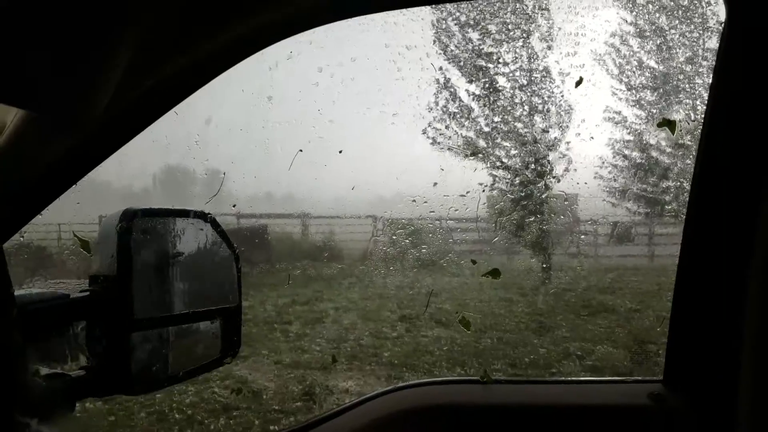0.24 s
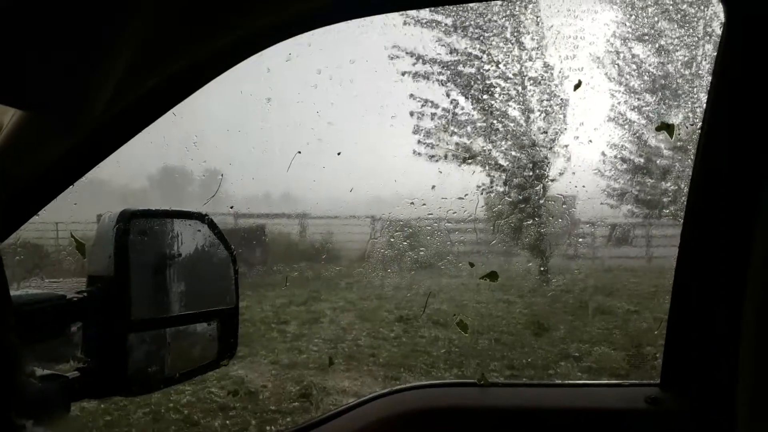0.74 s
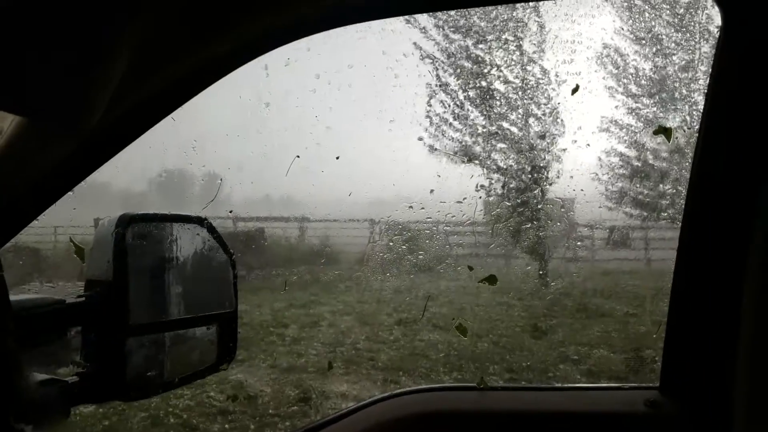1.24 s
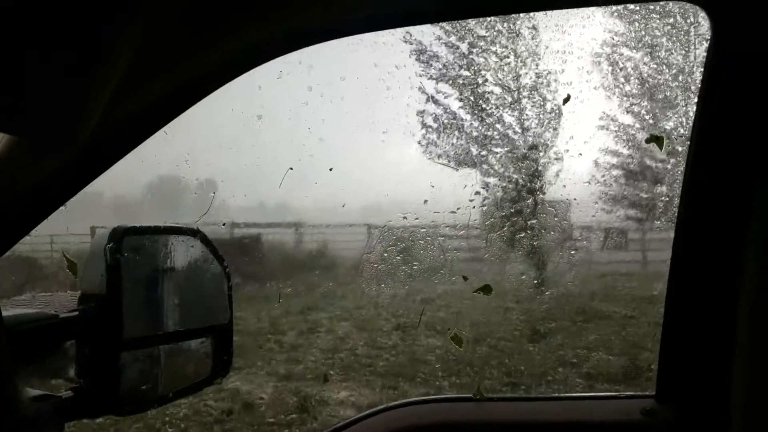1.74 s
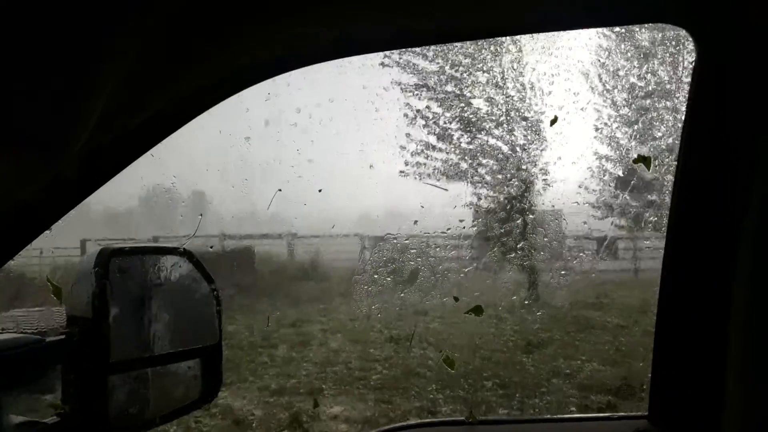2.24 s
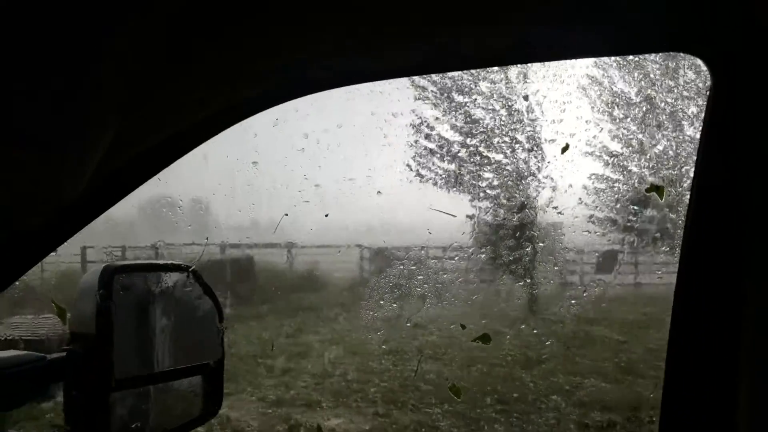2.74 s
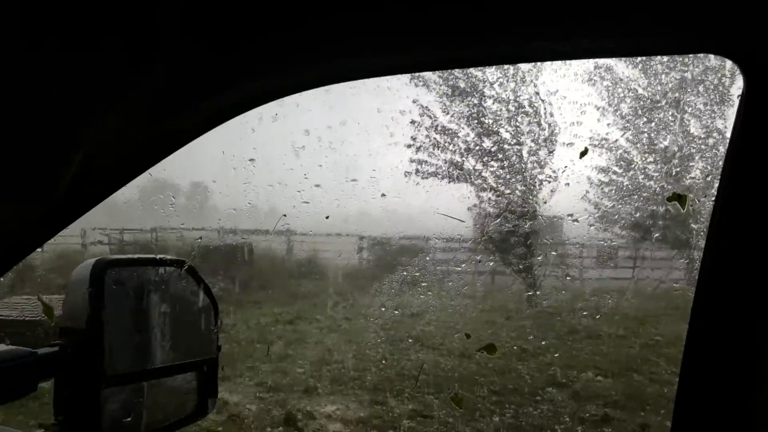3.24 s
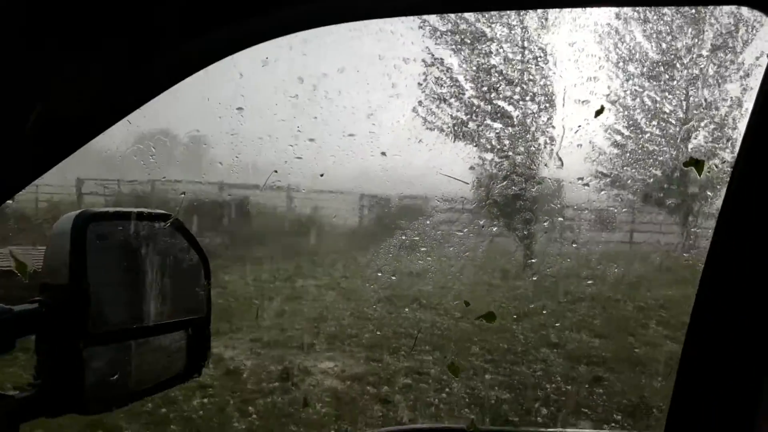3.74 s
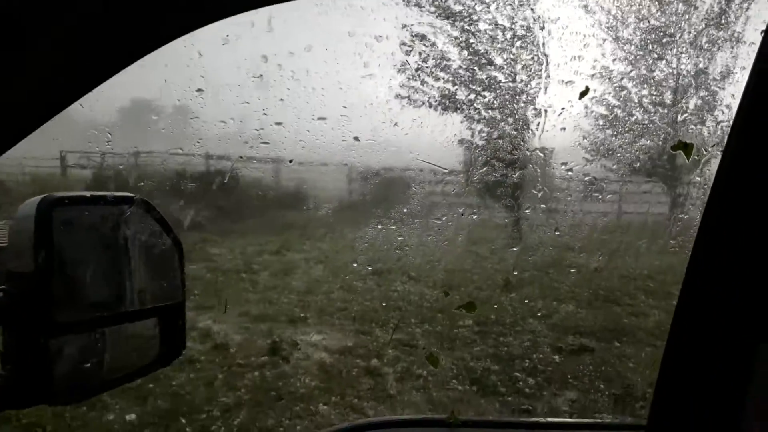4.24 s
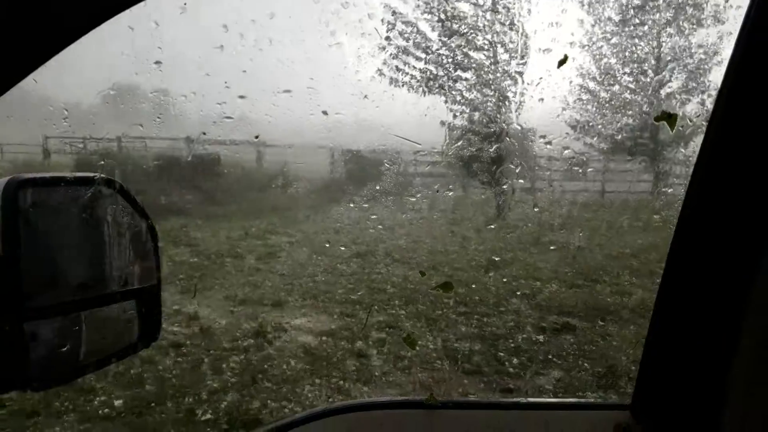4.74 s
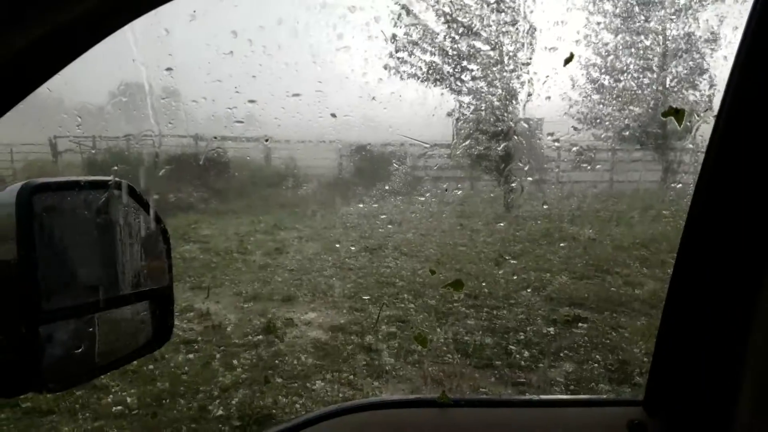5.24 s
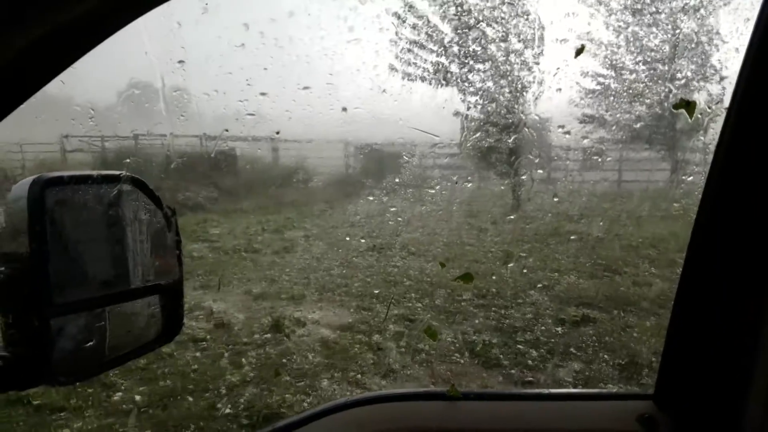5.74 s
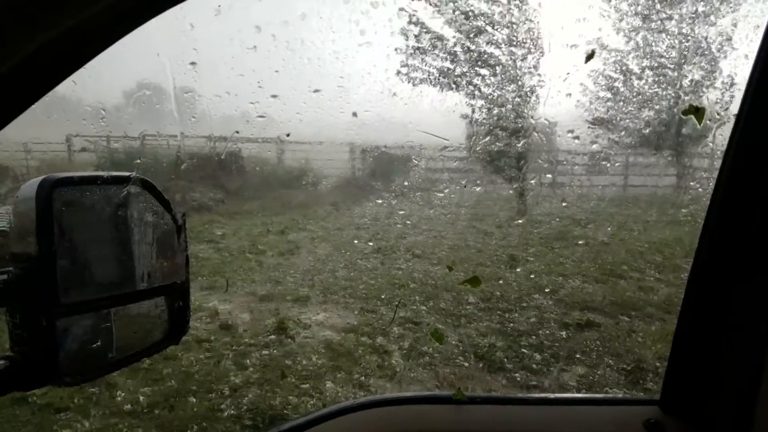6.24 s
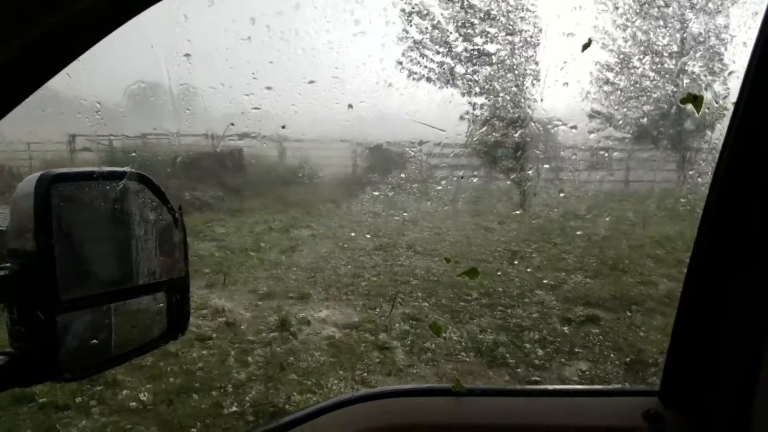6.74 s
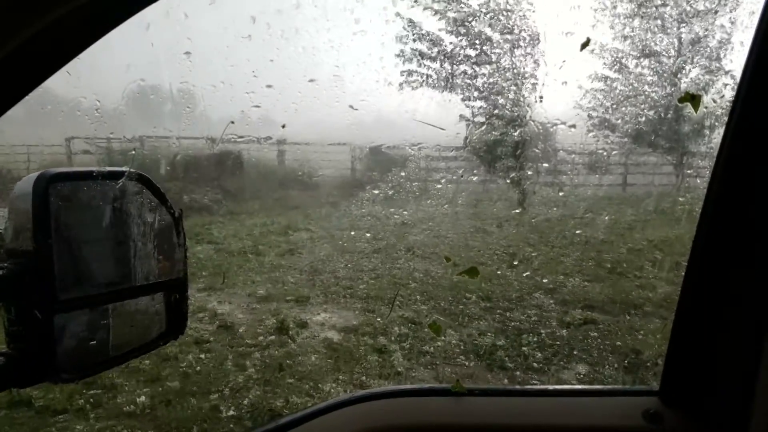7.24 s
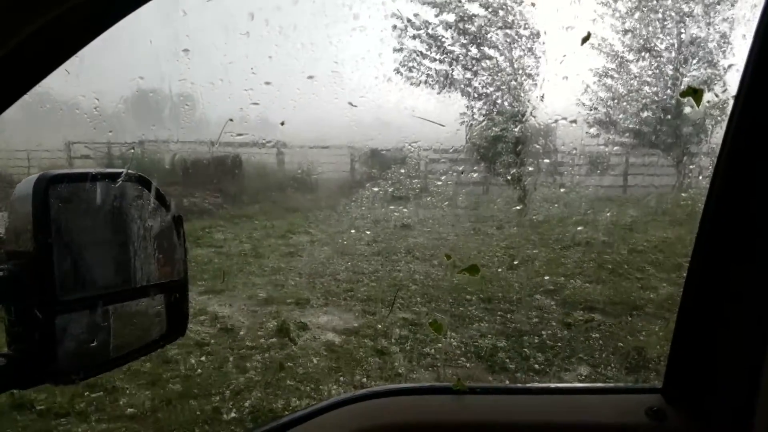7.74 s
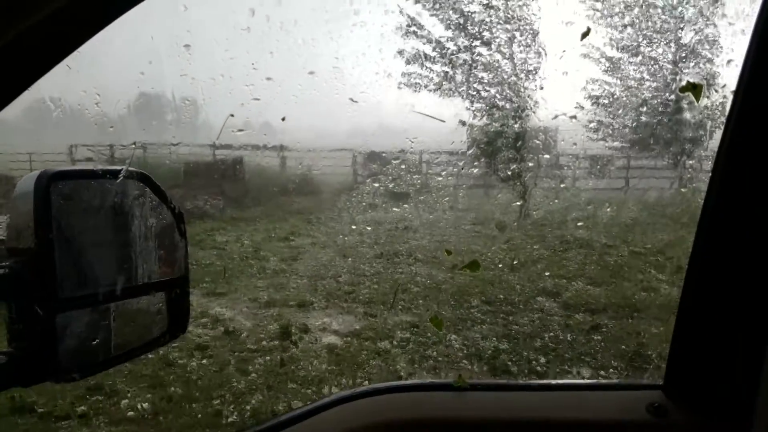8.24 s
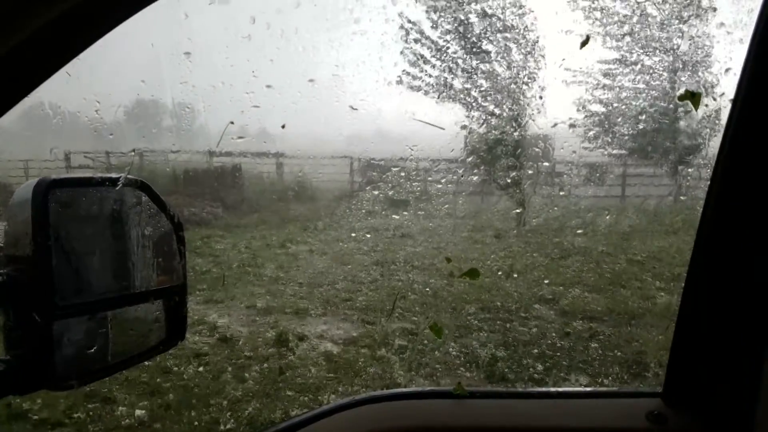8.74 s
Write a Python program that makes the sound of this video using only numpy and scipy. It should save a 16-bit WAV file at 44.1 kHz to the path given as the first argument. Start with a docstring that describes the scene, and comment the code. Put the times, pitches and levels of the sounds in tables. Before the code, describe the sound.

Hailstones hit the metal roof and windows around the listener in a dry, small cab. Dense rattling knocks and two heavy drum-like thuds come first, then irregular snapping cracks, a busy cluster of dull taps midway, and a few hard bright ticks on the near glass. The last seconds are mostly quiet, with weak isolated knocks over soft rain patter, a low rumble and faint microphone hiss.

```python
"""Hail on a parked vehicle

Heard from inside the closed cab: ice cracks and shatters on roof and glass (band-filtered noise bursts),
heavy stones set the body panels drumming (decaying sine modes), and a few hard ticks strike the near window.
Rain and small pellets patter underneath (shaped noise). A small microphone port rings near 8 kHz."""
import sys
import numpy as np
from scipy import signal
from scipy.fft import rfft, irfft
from scipy.io import wavfile
from scipy.ndimage import uniform_filter1d

SR = 44100
rng = np.random.default_rng(int(sys.argv[2]) if len(sys.argv) > 2 else 0)


def persist_wave(psi):
    """Save psi, clipped to +-1, as 16-bit WAV."""
    counts = np.round(np.clip(psi, -1, 1) * 32767).astype(np.int16)
    wavfile.write(sys.argv[1], SR, np.atleast_2d(counts).T)


def boost_factor(decibels):
    """Convert a level in decibels to a linear amplitude factor."""
    exponent = np.asarray(decibels, float) / 20
    return 10 ** exponent


N = 396459  # length in samples

# modes of the body panels and cabin air: pitch_hz, level_db (relative), t60_ratio (to the blow's own t60)
PANEL_MODES = [(62.2, -1.5, 1.7), (84, -1, 1.6), (120, 2.5, 1.2), (135, -2, 0.78), (166, -1, 0.57),
               (193, -3, 1.1), (229, -2, 0.75), (258, 0, 0.74), (302, 0.5, 0.91), (332.1, 0, 0.74),
               (353, -6.5, 1.3), (396.9, -2.5, 0.62), (449, -1, 0.48), (517.5, 2.5, 0.37), (572, 0, 0.63),
               (661, -3.5, 0.63), (751, 0, 0.35), (837, -7, 0.5), (930, -6.5, 0.43), (1040, -15, .35)]


def evened(x):
    """Normalization: scales a signal to unit rms."""
    return x / np.sqrt(np.mean(x ** 2) + 1e-20)


def add(mix, start_s, sound):
    """Superposition: sums a sound into the mix from its start time."""
    part = mix[max(round(start_s * SR), 0):][:len(sound)]
    part += sound[:len(part)]


def coloured(x, points):
    """Linear filtering: multiplies the spectrum by a gain curve given as (Hz, dB) points."""
    point_hz, gain_db = np.transpose(points)
    hz = np.fft.rfftfreq(len(x), 1 / SR)
    gain = boost_factor(np.interp(np.log(hz + 1), np.log(point_hz + 1), gain_db))
    return irfft(rfft(x) * gain, len(x))


def swell(t, rise_s, t60_s, curve):
    """Build-up and decay of reflections: peak 1, falling ever faster in dB if curve is over 1."""
    fall = (t / np.clip(t60_s, .002, .5)) ** curve
    shape = (1 - np.exp(-t / rise_s)) ** 2 * boost_factor(-60 * fall)
    return shape / shape.max(axis=0)


def electronics():
    """Circuit noise: a steady coloured fizz on a small constant offset."""
    # fizz spectrum: pitch_hz, level_db (relative, per Hz)
    fizz_spectrum = [(300, -1), (1000, -2.5), (2500, -2), (5500, -10.5), (8300, -6.5), (11000, -8),
                     (15500, -9.5), (20000, 0)]
    fizz = boost_factor(-72.5) * evened(coloured(rng.standard_normal(N), fizz_spectrum))
    offset = -.0004
    return fizz + offset


def rumble():
    """Transmission through panels: rain and far hail reach the cabin as a lumpy low wash of noise."""
    # course of the wash: time_s, level_db (before the lumps)
    wash_course = [(0, -60.5), (1.3, -60.5), (1.6, -68.5), (4.4, -67.5), (4.7, -71), (8.99, -72.5)]
    # wash spectrum: pitch_hz, level_db (relative, per Hz)
    wash_spectrum = [(20, -24), (45, -16.5), (75, -1.5), (118, -4), (165, -5), (240, -5), (630, -15.5),
                     (1500, -26.5), (3000, -55)]
    low, lump = rng.standard_normal((2, N))
    lumps_db = 3 * evened(uniform_filter1d(uniform_filter1d(lump, size=1500), size=1500))
    level_db = np.interp(np.arange(N) / SR, *np.transpose(wash_course))
    return evened(coloured(low, wash_spectrum)) * boost_factor(level_db + lumps_db)


def rain_hiss():
    """Incoherent addition: powers of the gusty rain, random drops and pellets sum under one treble noise."""
    # rain driven on the glass by gusts: time_s, level_db
    gust_course = [(0, -79.5), (0.95, -78), (1.9, -86), (2.2, -76), (2.55, -83.5), (3.05, -74.5),
                   (3.7, -85), (4.4, -77.5), (4.7, -85.5), (5.15, -89), (5.7, -83), (6.2, -89.5),
                   (7, -91.5), (7.4, -87.5), (8.1, -85.5), (8.4, -80), (8.99, -88.5)]
    # light pellets that only reach the treble: start_s, level_db (rms at the peak)
    pellet_hits = [(0.064, -68), (1.83, -70), (2.2826, -68.5), (2.365, -65.5), (2.439, -69.5), (2.612, -69),
                   (2.7503, -68.5), (3.375, -63), (3.485, -65.5), (3.5237, -69), (3.5922, -68),
                   (5.314, -65.5), (5.5858, -66), (5.603, -65.5), (6.1233, -73), (7.369, -67.5),
                   (7.386, -70), (7.4885, -70), (7.8502, -68.5), (8.244, -68.5), (8.4347, -71),
                   (8.5067, -68.5), (8.5576, -69.5), (8.592, -70)]
    # hiss spectrum: pitch_hz, level_db (relative, per Hz)
    hiss_spectrum = [(2000, -27.5), (5500, -10), (8000, -0.5), (11000, -5), (16000, -8.5)]
    t = np.arange(N) / SR
    high, draw, size = rng.standard_normal((3, N))
    level = boost_factor(np.interp(t, *np.transpose(gust_course)))
    is_drop = draw > 3.1  # rare random samples
    blow_power = (is_drop * level * boost_factor(-1 + 4 * abs(size))) ** 2
    for start_s, level_db in pellet_hits:
        blow_power[round(start_s * SR)] += boost_factor(level_db) ** 2
    splash_shape = swell(t[:4000], .001, 0.089, 0.88) ** 2
    splash_power = signal.oaconvolve(blow_power, splash_shape)[:N].clip(0)
    return evened(coloured(high, hiss_spectrum)) * np.sqrt(level ** 2 + splash_power)


def window_ticks():
    """Impact excitation: a bare click of ice on the near window, sharp enough to ring the microphone port."""
    # hard ticks: start_s, level_db (peak, before the port)
    tick_hits = [(4.8149, -27), (5.7699, -19), (5.7736, -21.5)]
    out, t = np.zeros(N), np.arange(300) / SR
    click = np.sin(2 * np.pi * 7900 * t) * swell(t, .0004, .0028, 1)
    for start_s, level_db in tick_hits:
        add(out, start_s, boost_factor(level_db) * click)
    return out


def drum(chance, low_db, struck_hz, upper_db):
    """Modal synthesis: a blow rings damped panel modes; each lands elsewhere, so sizes and phases vary."""
    # how long a middling blow rings, and how much shorter for each dB of extra force
    middling_db, middling_t60_s, t60_s_per_db = -45.5, .175, .0002
    # low modes fade away from the struck pitch, faster for heavy blows
    focus_db_per_oct, heavy_focus_per_db = 15.5, 0.27
    # bass takes longer to fill the cabin
    rise_s, rise_cycles = .0028, .65
    t = np.arange(14000)[:, None] / SR
    mode_hz, mode_db, t60_ratio = np.transpose(PANEL_MODES)
    low = mode_hz < 385
    force_db = low_db - middling_db
    t60_s = (middling_t60_s - t60_s_per_db * force_db) * t60_ratio
    focus = focus_db_per_oct + heavy_focus_per_db * force_db
    fade_db = focus * low * abs(np.log2(mode_hz / struck_hz))
    size = boost_factor(mode_db - fade_db + 8 * (chance[2] - .5))
    low_gain = boost_factor(low_db) / np.linalg.norm(size[low])
    upper_gain = boost_factor(upper_db) / np.linalg.norm(size[~low])
    size *= np.where(low, low_gain, upper_gain)
    shape = swell(t, rise_s + rise_cycles / mode_hz, t60_s, 1.5)
    # each mode has a detuned twin on the neighbouring panel, so the ring beats unevenly
    main_hz = mode_hz * (1 + 0.05 * (chance[1] - .5))
    twin_hz = mode_hz * (1 + .16 * (chance[3] - .5))
    rings = np.sin(2 * np.pi * (main_hz * t + chance[0]))
    rings += .7 * np.sin(2 * np.pi * (twin_hz * t + chance[4]))
    return 1.15 * (shape * rings) @ size


def shatter(noise, knock_db, knock_hz, splinter_db, t60_s):
    """Band-wise decay: splintering ice and reflections as grainy noise in bands, the treble dying first."""
    # band centres in Hz; the outer two are silent edges
    centres_hz = [450, 1150, 2400, 4600, 8000, 13500, 19000]
    # roof and glass as a filter: pitch_hz, gain_db
    shell_filter = [(3300, -2), (4300, 2), (6100, -2.5), (7200, -1.5)]
    # the knock fades below and above its pitch
    knock_rise_db_per_oct, knock_fall_db_per_oct = 10.5, 11.3
    # splinters spill into the bands below and above their own
    splinter_spill_db = np.array([-11, 0, -6.5])
    # rise time as a share of the t60: far, long cracks also start softly
    rise_s = .03 * t60_s
    t, hz = np.arange(len(noise)) / SR, np.fft.rfftfreq(len(noise), 1 / SR)
    grainy = noise[:, 0] * boost_factor(2.5 * evened(uniform_filter1d(noise[:, 1], size=40)))
    # every spot of the shell has its own crowd of short resonances
    spots_db = 3.2 * evened(uniform_filter1d(noise[:len(hz), 2], size=50))
    spectrum = rfft(grainy) * boost_factor(spots_db)
    octaves = np.log2(np.array(centres_hz[1:4]) / knock_hz)
    knock_fade_db = np.maximum(knock_fall_db_per_oct * octaves, -knock_rise_db_per_oct * octaves)
    knock = boost_factor(knock_db - knock_fade_db)
    splinter = boost_factor(splinter_db + splinter_spill_db)
    # knock and splinters share the middle band
    sizes = [knock[0], knock[1], np.hypot(knock[2], splinter[0]), splinter[1], splinter[2]]
    t60_ratios = [1.2, 1.05, 1., .95, .95]
    out = np.zeros(len(t))
    for k, (size, t60_ratio) in enumerate(zip(sizes, t60_ratios)):
        share = np.interp(np.log(hz + 1), np.log(centres_hz[k:k + 3]), [0, 1, 0]) ** 1.6
        # the time lead lets the direct crack arrive at once
        ring = swell(t + .0008, rise_s, t60_s * t60_ratio, 1.35)
        ring += boost_factor(-33.0) * swell(t, .01, 0.25, 1)  # the cabin's faint tail
        out += size * evened(irfft(spectrum * share, len(t))) * ring
    return coloured(out, shell_filter)


def scene():
    """Superposition of sources: thuds and cracks over rumble, rain hiss and ticks."""
    # blows that drum the panels: start_s, low_db (low modes together), struck_hz (best-driven pitch),
    # upper_db (upper modes together); levels before the twin modes and a common gain
    blows = [(0.115, -70, 200, -60), (.145, -51, 133, -52), (.175, -48.5, 200, -46.5), (.24, -45, 142, -42),
             (.279, -53, 222, -45), (.324, -46.5, 282, -42), (.429, -37, 324, -42.5),
             (0.484, -40, 270, -51.5), (0.52, -45, 147, -57), (.601, -18, 245, -31), (.625, -23, 200, -33),
             (0.655, -28, 207, -32.5), (.692, -32.5, 218, -43), (.746, -47.5, 248, -44),
             (.842, -56, 237, -40), (.88, -45, 260, -55), (.9, -16.5, 262, -21), (.918, -19, 180, -30),
             (.95, -26, 175, -42), (1.003, -49, 204, -59), (1.038, -43.5, 196, -47), (1.118, -43, 310, -38),
             (1.193, -56, 255, -43), (1.236, -50.5, 120, -44), (1.342, -49, 255, -43),
             (1.632, -50.5, 244, -44), (1.653, -67, 238, -42.5), (1.698, -49, 192.5, -69),
             (1.898, -57, 125, -73.5), (2.023, -43, 245, -48.5), (2.115, -50, 278, -48),
             (2.171, -40.5, 312, -40), (2.204, -46.5, 249, -61), (2.516, -52, 220, -48),
             (2.566, -50, 120, -72), (2.595, -54.5, 119, -71), (2.866, -60, 200, -56),
             (2.89, -49, 155, -55), (2.931, -49, 258, -49), (2.958, -56, 216, -40),
             (2.975, -35.5, 223, -50), (3.021, -45.5, 198, -61), (3.084, -53, 192, -68),
             (3.139, -48.5, 206, -50), (3.171, -52, 128, -64), (3.321, -44.5, 265, -45),
             (3.4, -48, 147, -53.5), (3.731, -52, 164, -52), (3.787, -45, 193, -46),
             (3.82, -51.5, 219, -57), (3.93, -55, 179, -59.5), (4.112, -49, 207, -42),
             (4.161, -50, 168, -58), (4.217, -44.5, 165, -50.5), (4.269, -42.5, 229, -41),
             (4.302, -38.5, 240, -40.5), (4.347, -40.5, 203, -41.5), (4.394, -45, 177, -67),
             (4.442, -40.5, 226, -44.5), (4.49, -56, 200, -57), (4.531, -50, 152, -56),
             (4.811, -65.5, 299, -56), (5.004, -51.5, 278, -43.5), (5.32, -65, 200, -63),
             (5.359, -61, 142, -56), (5.39, -60, 200, -63), (5.67, -53, 224, -55), (5.7, -53, 200, -62),
             (5.816, -56, 193, -64), (5.895, -58, 185, -57), (5.925, -52, 200, -50),
             (5.974, -47.5, 216, -56), (6.156, -48, 202, -64.5), (6.217, -44, 226, -51.5),
             (6.373, -53.5, 242, -48.5), (6.433, -39, 173, -44.5), (6.489, -51, 180, -63),
             (6.958, -66.5, 140.4, -64.5), (7.1, -58, 141, -70), (7.179, -53, 252, -57.5),
             (7.221, -49.5, 268, -52.5), (7.491, -62, 250, -65), (7.522, -45, 191, -52.5),
             (7.673, -53.5, 180, -57), (7.694, -49.5, 167.4, -56), (8.291, -57, 208, -59.5),
             (8.33, -58, 200, -62), (8.376, -59, 133, -56)]
    # ice cracking on the shell: start_s, knock_db, knock_hz, splinter_db, t60_s (scaled band by band);
    # levels are rms before the decay and the shell filter
    ice_cracks = [(0.1164, -62, 1700, -80, 0.14), (0.1429, -40.5, 1550.0, -53.5, 0.098),
                  (0.1783, -32, 3140.0, -42.5, 0.049), (0.2185, -51.0, 1400.0, -65, 0.2),
                  (0.2464, -41.5, 3220.0, -52, 0.14), (0.2794, -37, 3290.0, -60.5, 0.043),
                  (0.3226, -41.5, 2120.0, -53.5, 0.073), (0.429, -39.5, 2280.0, -70, 0.063),
                  (0.441, -53, 1240.0, -61, 0.056), (0.4852, -55, 1790.0, -66.5, 0.11),
                  (0.5098, -56.5, 4420.0, -60.5, 0.073), (0.587, -62, 1300.0, -63.0, 0.062),
                  (0.602, -34, 1050.0, -68, 0.11), (0.6305, -36, 970.0, -59.5, 0.065),
                  (0.671, -29, 1620.0, -54.5, 0.063), (0.7453, -60.0, 1880.0, -81.5, 0.057),
                  (0.757, -40, 2020.0, -51, 0.046), (0.7824, -30.0, 3460.0, -41.5, 0.038),
                  (0.8443, -36.5, 2070.0, -65, 0.034), (0.873, -51.5, 1700.0, -79, 0.2),
                  (0.9, -32.5, 1340.0, -56.5, 0.083), (1.005, -56.5, 1300.0, -69, 0.095),
                  (1.0395, -35, 3140.0, -47.5, 0.046), (1.0882, -56.0, 1440.0, -75.0, 0.13),
                  (1.1198, -38, 1620.0, -60.5, 0.051), (1.1943, -40.5, 1050.0, -61.5, 0.057),
                  (1.2198, -60.0, 2400.0, -80.5, 0.16), (1.2482, -54.0, 1750.0, -62, 0.076),
                  (1.324, -56, 1580.0, -60.5, 0.091), (1.3439, -41, 1700.0, -64.0, 0.069),
                  (1.3699, -45.5, 1700.0, -71, 0.028), (1.4476, -73, 2400.0, -61.5, 0.091),
                  (1.5626, -65, 1210.0, -63, 0.091), (1.6333, -30, 2400.0, -35.5, 0.043),
                  (1.6562, -43, 2850.0, -51.5, 0.076), (1.7323, -61.5, 1660.0, -63.0, 0.07),
                  (1.756, -66, 3500, -67, 0.1), (2.0243, -23.5, 3060.0, -35.5, 0.052),
                  (2.052, -37.5, 3900, -71, 0.04), (2.0773, -52, 3810.0, -59.5, 0.055),
                  (2.1172, -42.5, 1370.0, -55, 0.051), (2.1721, -41.5, 1930.0, -58.0, 0.075),
                  (2.2329, -56.5, 1240.0, -59, 0.053), (2.5176, -40, 3060.0, -43.5, 0.066),
                  (2.8653, -63, 1340.0, -63.5, 0.075), (2.8854, -62, 3000, -76, 0.09),
                  (2.9044, -52, 2120.0, -62.5, 0.3), (2.9325, -34.5, 2900, -46.5, 0.07),
                  (2.9593, -36.5, 1500, -54.0, 0.051), (2.985, -56, 2400.0, -67, 0.083),
                  (3.012, -56, 2400.0, -60.5, 0.094), (3.03, -62, 2600, -70, 0.13),
                  (3.1149, -64, 2400.0, -60.5, 0.08), (3.1432, -48, 1790.0, -64.0, 0.037),
                  (3.157, -53.5, 1970.0, -59.5, 0.11), (3.2282, -55, 1790.0, -61, 0.034),
                  (3.3224, -33.5, 2580.0, -50.0, 0.054), (3.4043, -49.5, 1470.0, -60.5, 0.09),
                  (3.5628, -63, 1700.0, -65.5, 0.057), (3.7315, -49.5, 1790.0, -61.5, 0.1),
                  (3.7825, -45.5, 1830.0, -53.5, 0.082), (3.809, -48, 3630.0, -57, 0.056),
                  (3.8334, -58, 1880.0, -73, 0.14), (4.109, -46.5, 1400.0, -58.5, 0.08),
                  (4.1965, -60, 1180.0, -69, 0.13), (4.2206, -43.5, 1660.0, -68, 0.044),
                  (4.2493, -50, 1400.0, -88, 0.053), (4.2703, -51, 3540.0, -59.5, 0.083),
                  (4.3132, -47.5, 1660.0, -63.0, 0.073), (4.351, -39, 1880.0, -62, 0.053),
                  (4.4449, -40, 1900, -53.5, 0.11), (4.4863, -50.5, 2400.0, -78, 0.06),
                  (4.5142, -58, 2340.0, -68, 0.067), (4.526, -57, 2460.0, -73.5, 0.055),
                  (4.5425, -57, 1470.0, -64.5, 0.062), (4.5554, -51.5, 1370.0, -77.0, 0.054),
                  (4.7342, -79.5, 1400.0, -52.5, 0.051), (4.8131, -29, 3290.0, -32.0, 0.047),
                  (4.9858, -67.5, 1620.0, -67, 0.11), (5.0069, -35, 1830.0, -54, 0.044),
                  (5.273, -69.5, 2280.0, -61.0, 0.0566), (5.315, -66, 4200, -68, 0.05),
                  (5.3624, -55.5, 1300.0, -75.0, 0.08), (5.4241, -51, 820.0, -63.5, 0.033),
                  (5.543, -71.5, 1340.0, -65, 0.067), (5.6721, -52, 3290.0, -64.5, 0.081),
                  (5.741, -60, 2020.0, -83.5, 0.043), (5.7685, -44.5, 1750.0, -38, 0.039),
                  (5.8238, -63.0, 1440.0, -59, 0.055), (5.8986, -56, 2520.0, -58, 0.06),
                  (5.9241, -45, 1580.0, -55.5, 0.095), (6.148, -54, 2920.0, -58.0, 0.1),
                  (6.1879, -63, 2500, -74, 0.08), (6.2069, -48.5, 2920.0, -56, 0.079),
                  (6.3735, -41, 3220.0, -47.0, 0.095), (6.4374, -57.5, 930.0, -82, 0.16),
                  (7.1811, -58, 3140.0, -65.5, 0.12), (7.2182, -59, 1660.0, -80, 0.15),
                  (7.49, -64, 1000, -72, 0.05), (7.5222, -56.0, 1440.0, -75, 0.089),
                  (7.6737, -56, 2780.0, -64, 0.076), (7.701, -60.5, 1240.0, -87, 0.08),
                  (8.3001, -58, 1270.0, -74, 0.11), (8.364, -64.0, 1620.0, -65.5, 0.13)]
    mix = rumble() + rain_hiss() + window_ticks()
    chances = rng.random((len(blows), 5, len(PANEL_MODES)))
    for (start_s, *blow), chance in zip(blows, chances):
        add(mix, start_s, drum(chance, *blow))
    noises = rng.standard_normal((len(ice_cracks), 6000, 3))
    for (start_s, *crack), noise in zip(ice_cracks, noises):
        add(mix, start_s, shatter(noise, *crack))
    return mix[None]


def port(dry):
    """Acoustic resonance: the small microphone port adds a ringing treble band to the direct path."""
    # resonance: centre_hz, width_hz, level_db (added to the direct path)
    centre_hz, width_hz, level_db = (8150, 1200, 10)
    b, a = signal.iirpeak(centre_hz, centre_hz / width_hz, fs=SR)
    return dry + boost_factor(level_db) * signal.lfilter(b, a, dry)


def band_limit(x):
    """A steep low-pass at the top of the band."""
    return signal.sosfilt(signal.butter(12, 16530, fs=SR, output="sos"), x)


def record(dry):
    """Signal chain: the port's resonance, then the noise and offset of the electronics."""
    mix = port(dry) + electronics()
    return band_limit(mix)


dry = scene()
out = record(dry)
persist_wave(out)
```